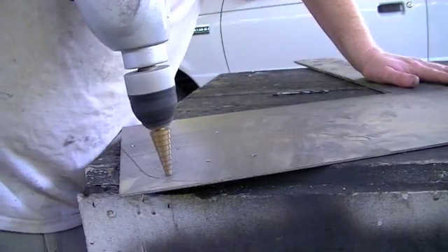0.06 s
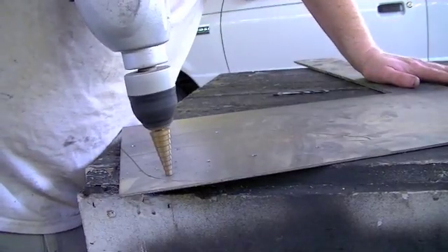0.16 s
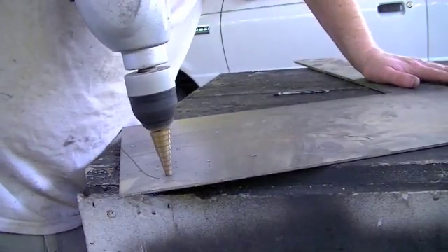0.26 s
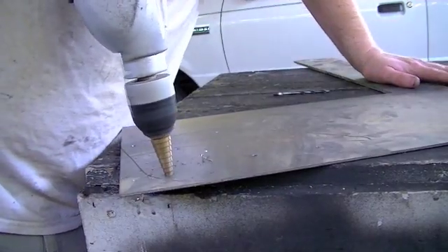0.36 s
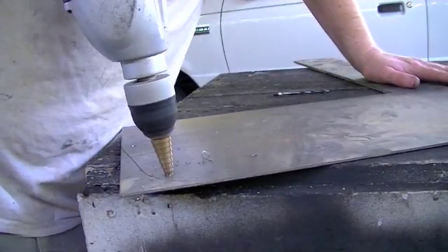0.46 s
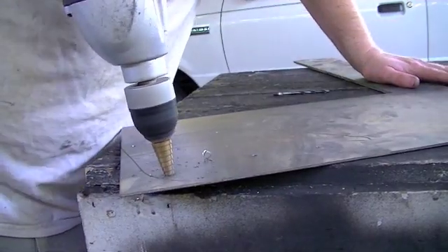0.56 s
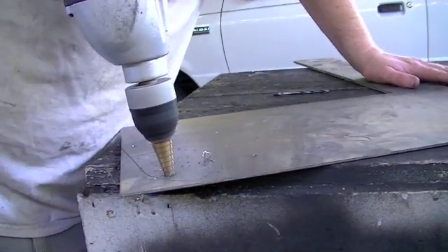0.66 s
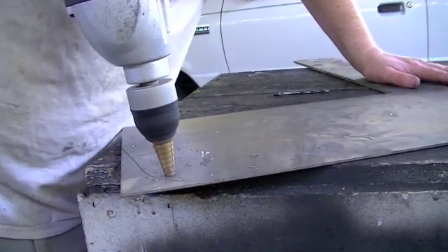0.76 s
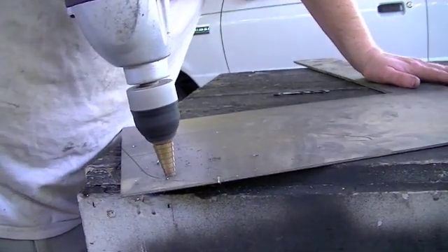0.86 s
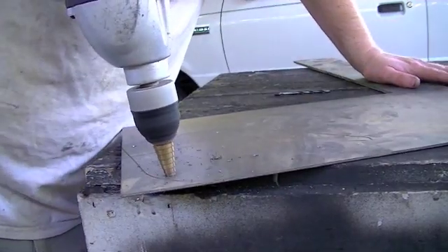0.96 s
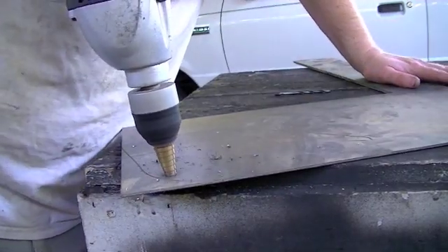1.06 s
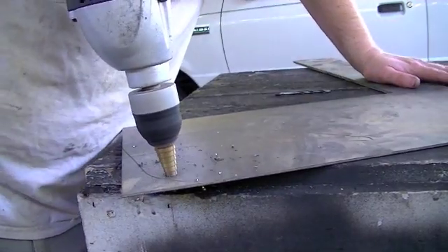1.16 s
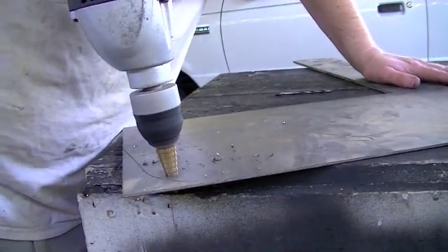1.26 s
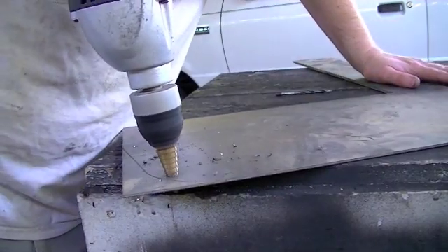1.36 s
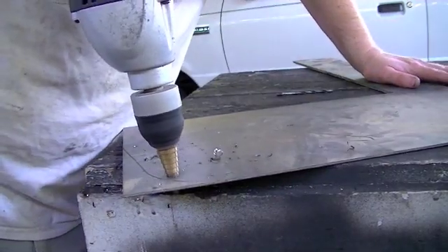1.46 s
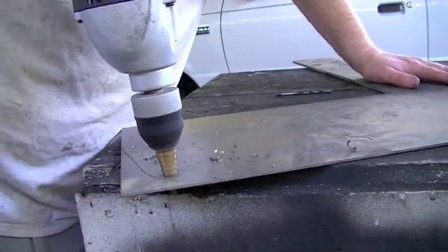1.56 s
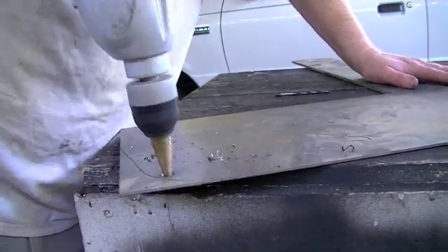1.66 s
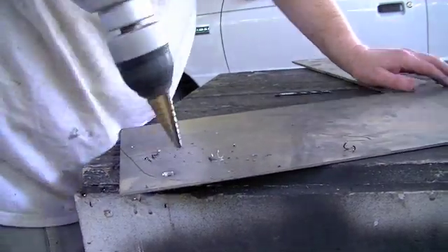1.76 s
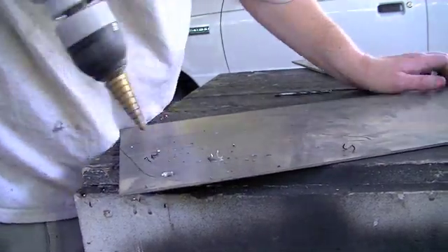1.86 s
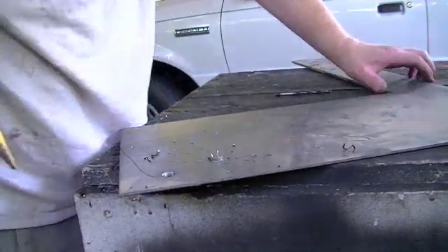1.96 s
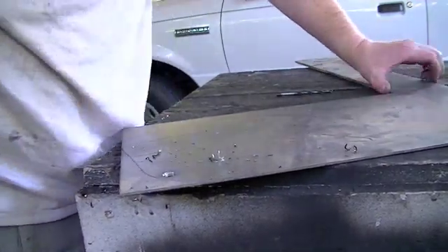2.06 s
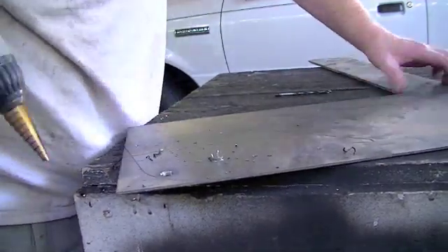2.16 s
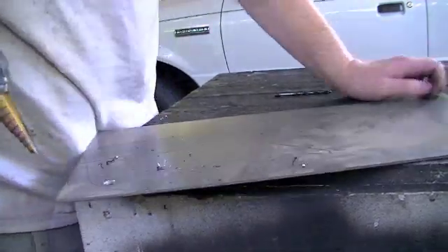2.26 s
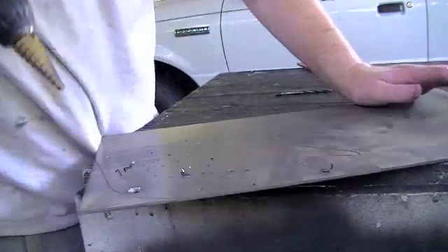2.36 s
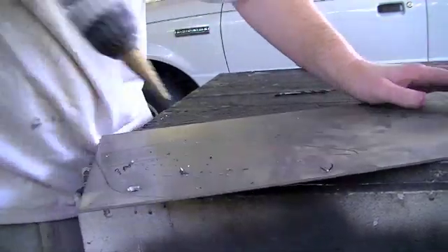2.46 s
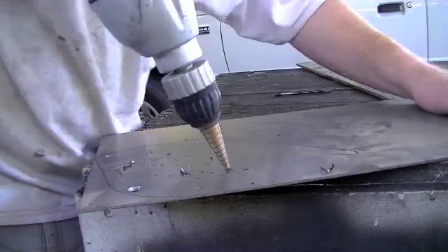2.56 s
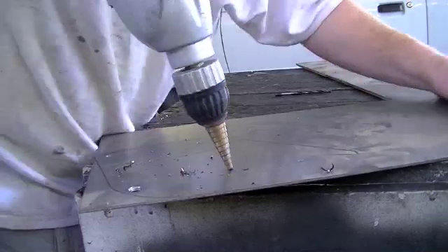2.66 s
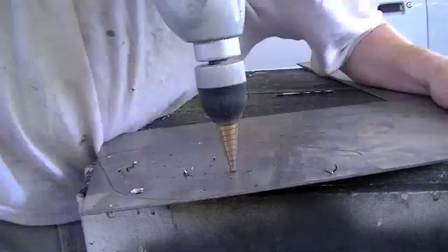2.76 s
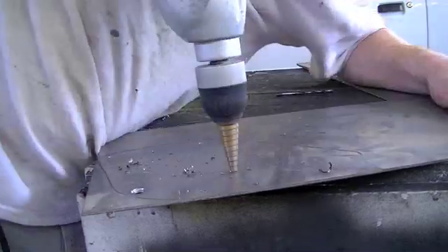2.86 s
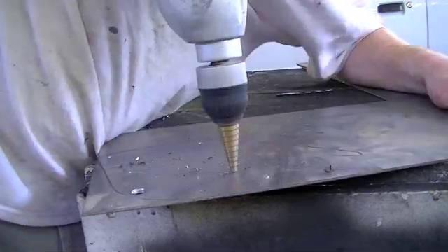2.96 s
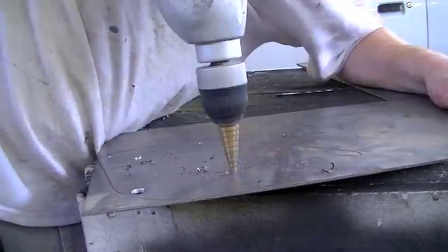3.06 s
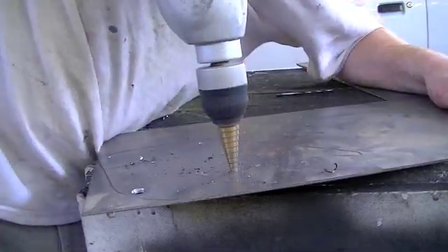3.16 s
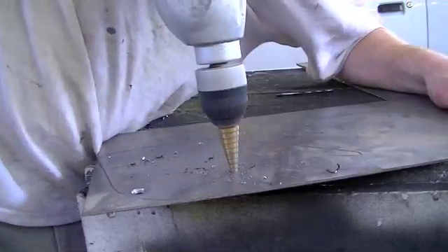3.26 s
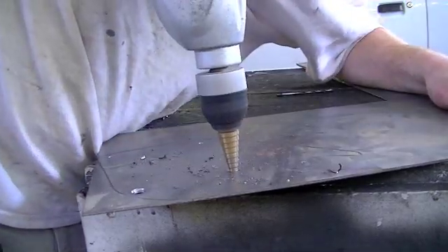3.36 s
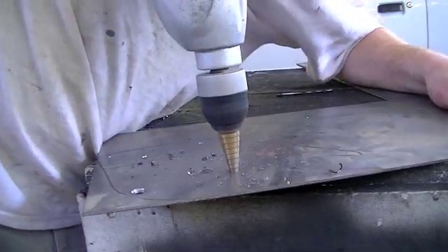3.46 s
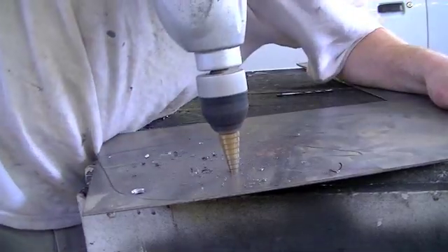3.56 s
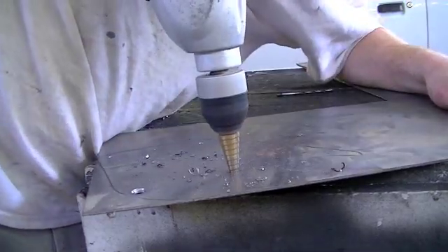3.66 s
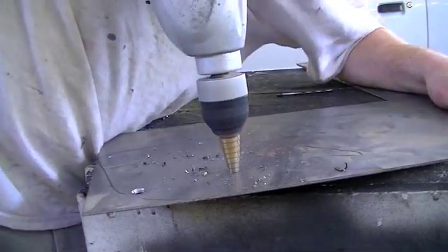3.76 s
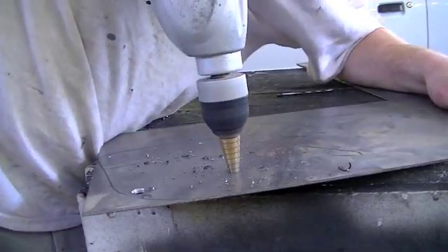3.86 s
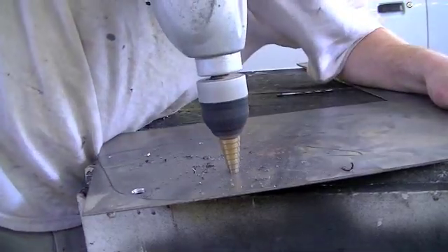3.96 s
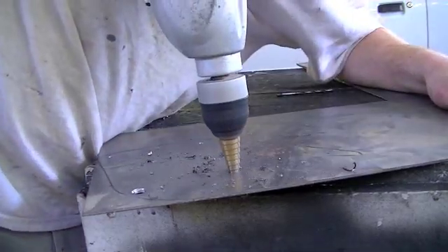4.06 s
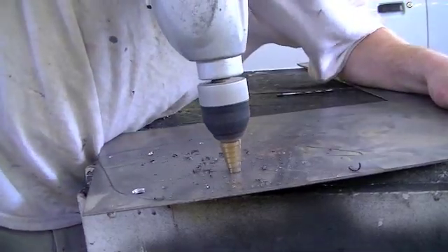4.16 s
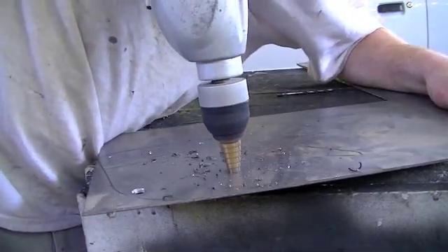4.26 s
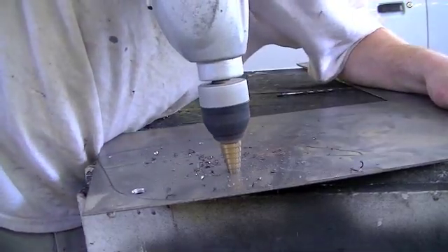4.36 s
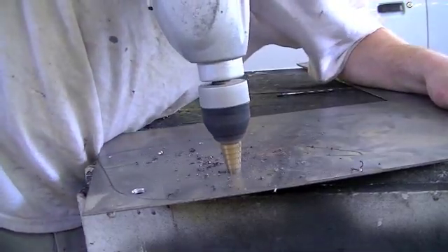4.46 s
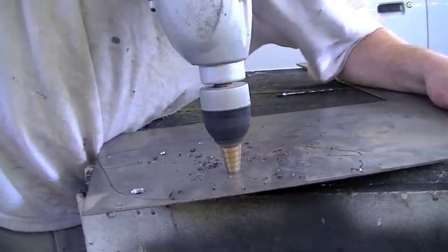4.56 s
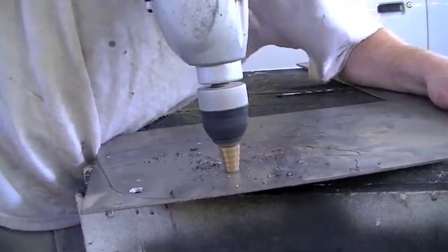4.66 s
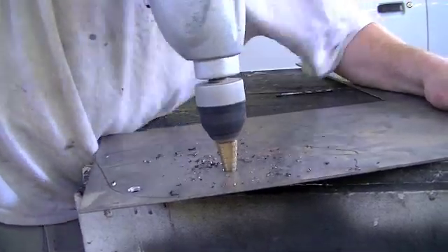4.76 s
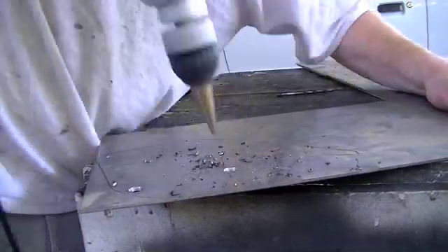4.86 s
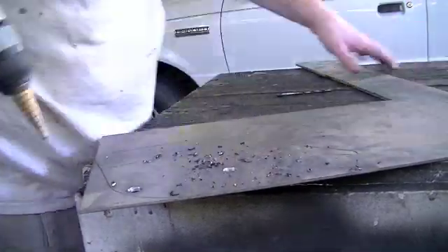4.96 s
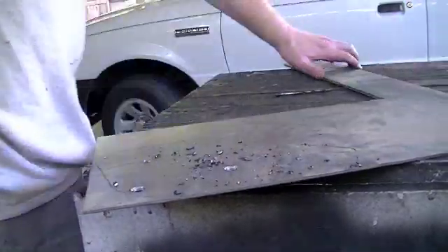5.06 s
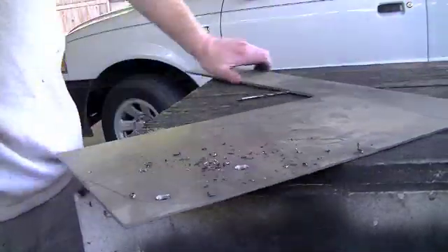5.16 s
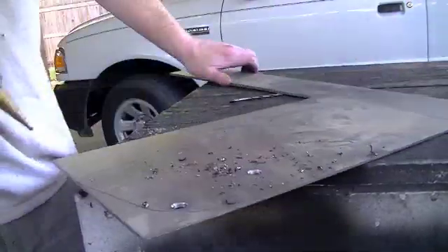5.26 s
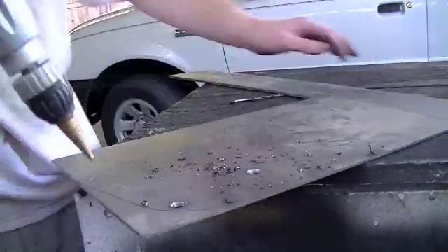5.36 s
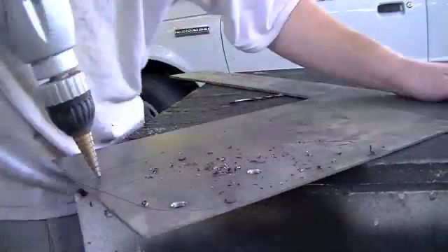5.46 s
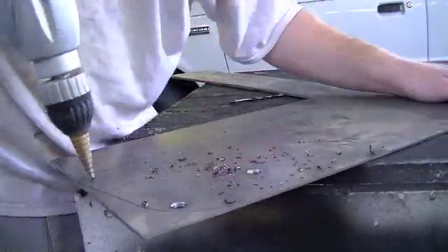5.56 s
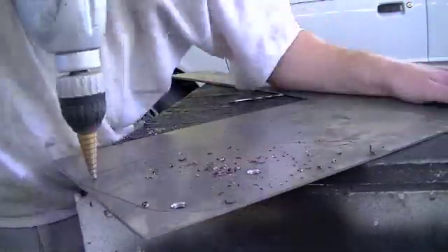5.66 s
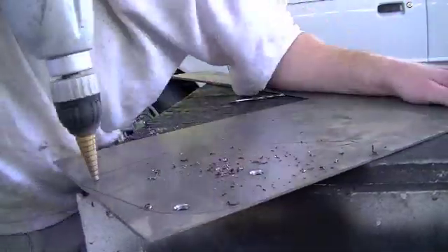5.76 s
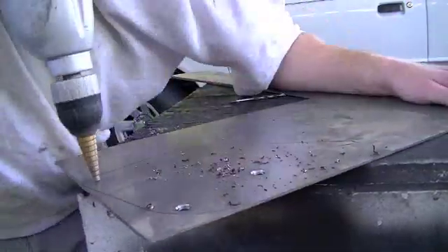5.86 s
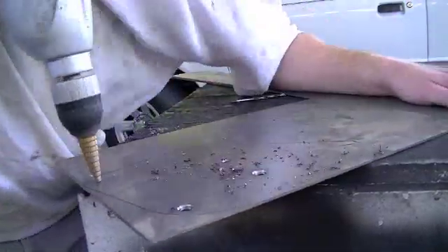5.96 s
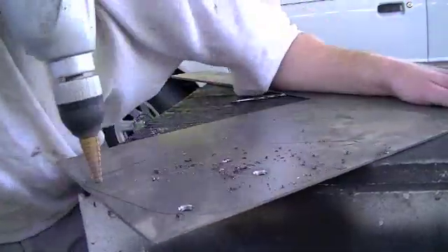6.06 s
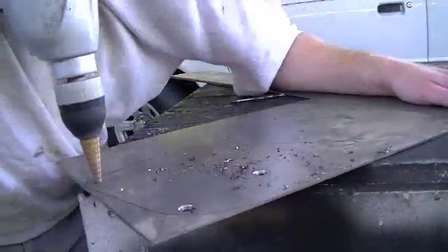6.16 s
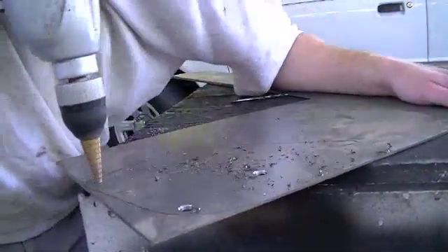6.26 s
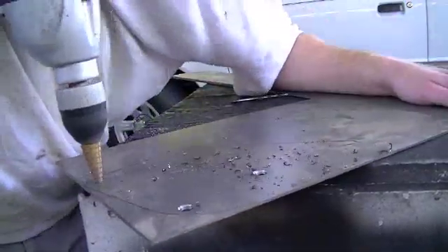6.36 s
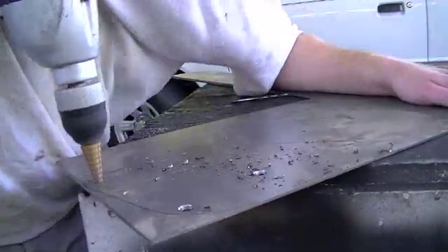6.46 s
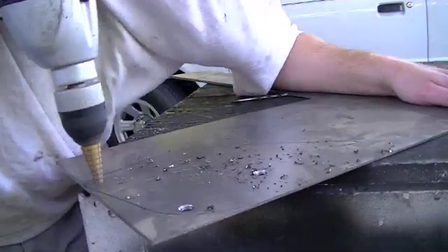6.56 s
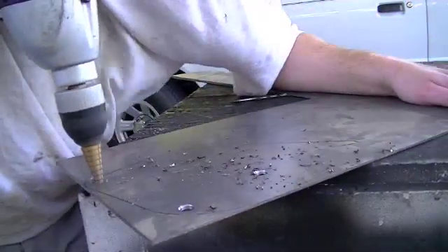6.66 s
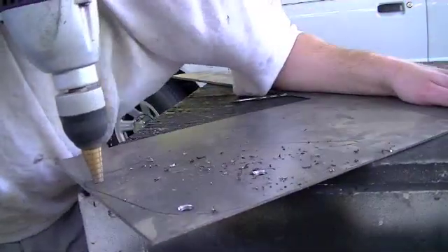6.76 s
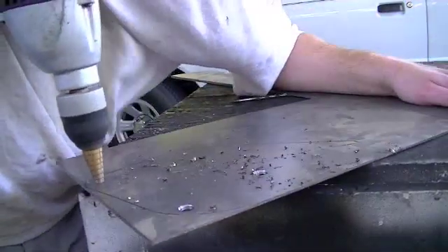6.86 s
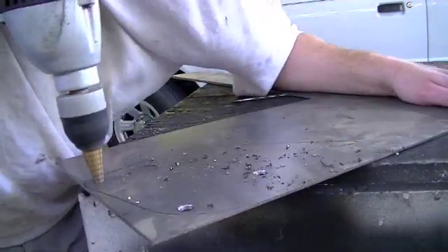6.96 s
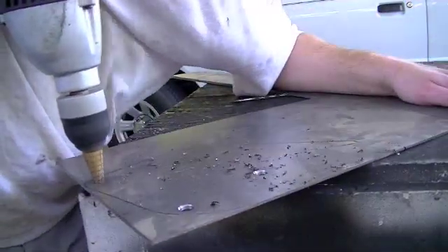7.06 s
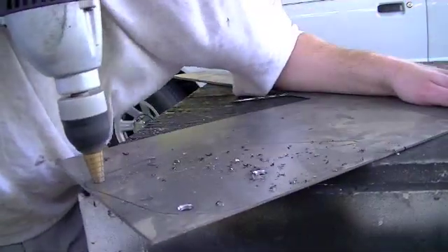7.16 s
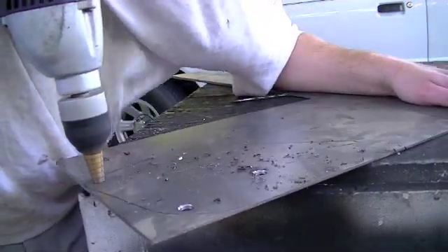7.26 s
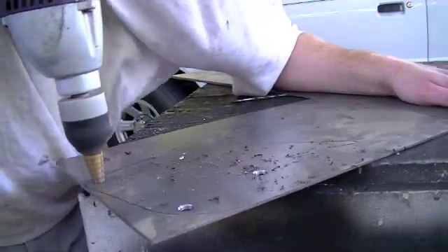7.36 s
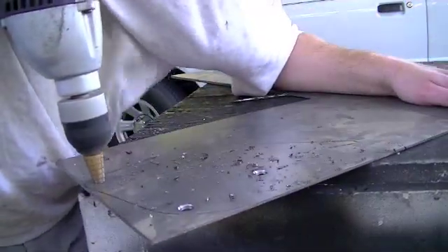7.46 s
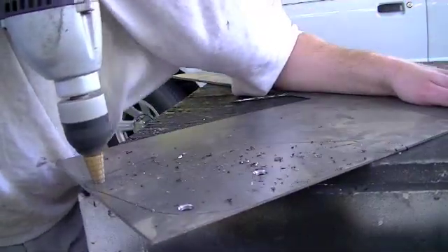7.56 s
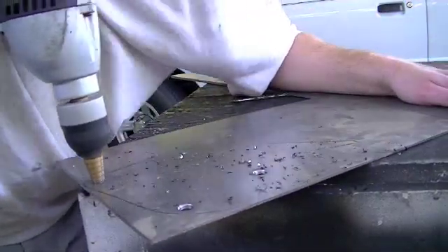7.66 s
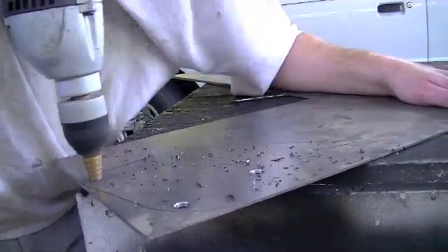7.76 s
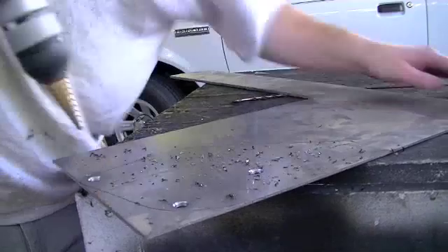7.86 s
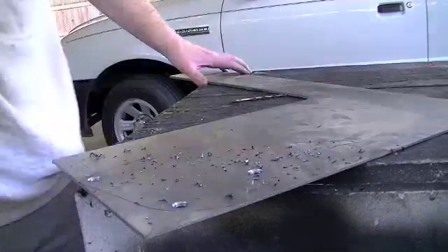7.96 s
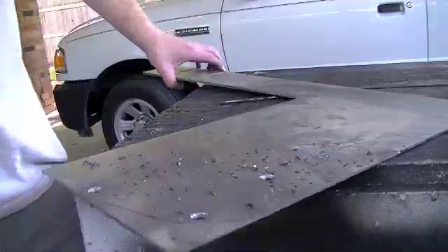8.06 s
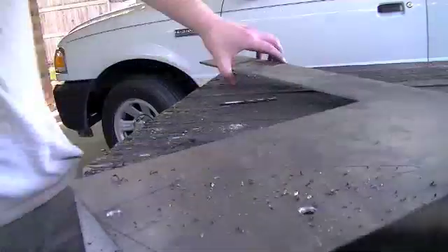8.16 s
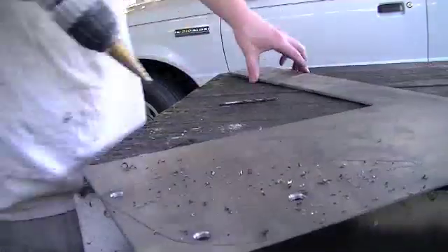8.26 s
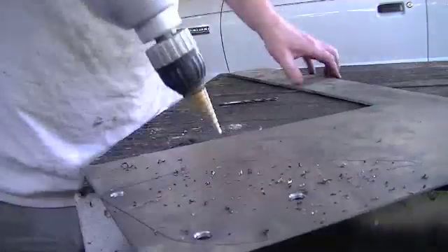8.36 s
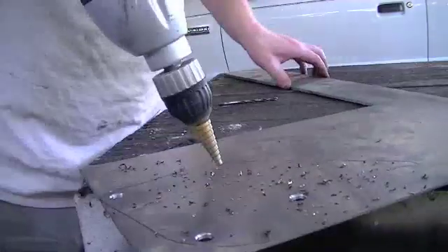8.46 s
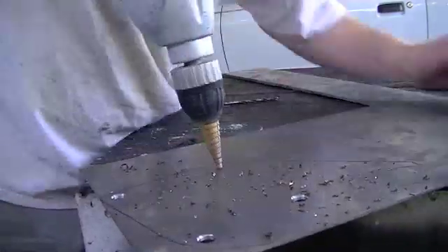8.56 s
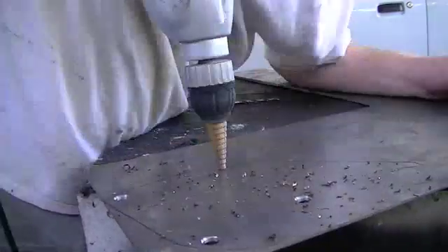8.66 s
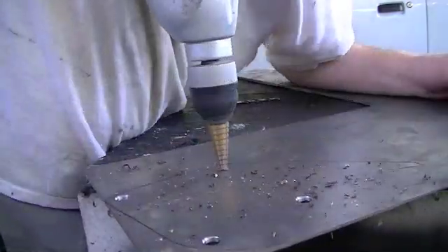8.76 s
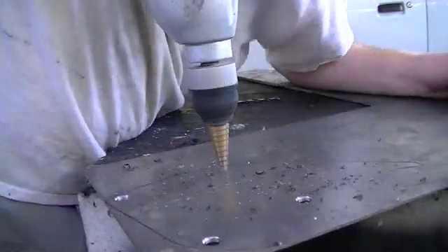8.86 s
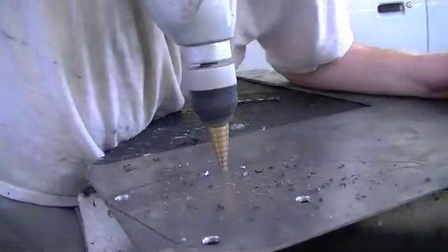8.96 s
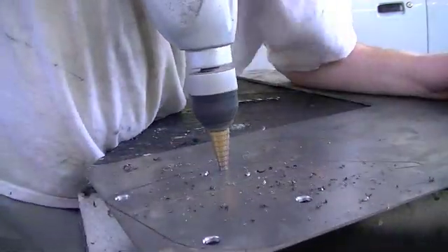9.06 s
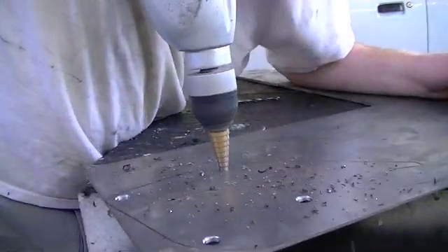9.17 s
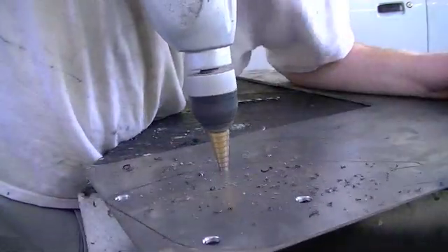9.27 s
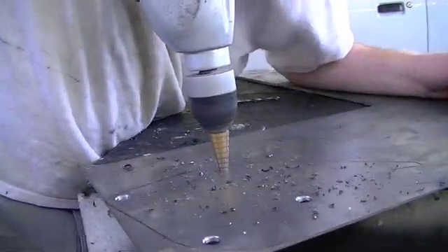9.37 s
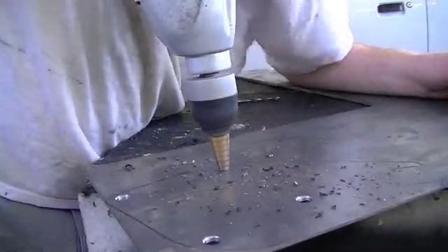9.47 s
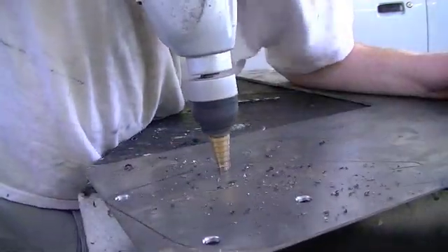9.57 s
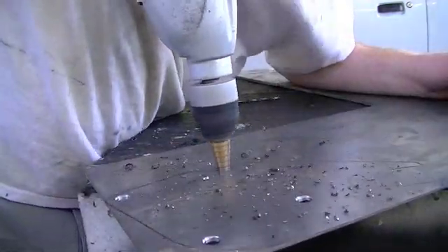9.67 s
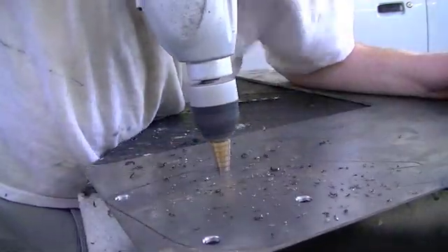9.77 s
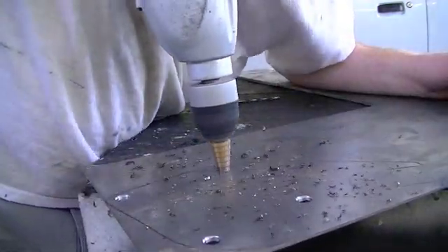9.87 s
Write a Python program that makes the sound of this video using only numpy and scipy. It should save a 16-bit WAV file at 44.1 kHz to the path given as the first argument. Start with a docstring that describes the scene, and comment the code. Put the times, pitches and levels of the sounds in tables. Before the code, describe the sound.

Close outdoor sound of an electric drill cutting a steel sheet on a bench. At 0 s it is already running, with a harsh, hard-rasping screech gliding upward and fading by 0.6 s under gusty rumble. Hissing motor whine, gear rattle and growl continue, sagging at 0.6 and 1.1 s, until release at 1.6 s and a quick falling whistle. From 2 to 2.7 s the sheet scrapes and the bit taps it. The second spell starts at 2.8 s with chattering and dull bumps, grinding on to 4.6 s. Coast-down, gritty sliding and ringing clinks fill 4.7-5.7 s. The third spell, 5.9-7.7 s, starts with a howling growl and slows repeatedly under load. Scrapes and taps return at 8.1-8.8 s. The fourth spell starts at 8.8 s, with bright sheet ringing and, from 9.5 s, a rough, swelling screech to the end. Faint open air and wavering distant hum lie behind.

```python
"""An electric drill pushes a stepped bit through a steel sheet on a bench, in four spells close to the microphone.
One tooth rate drives its whine, rattle and growl; it spins up, sags each time a step bites, and coasts down.
The cutting edge grinds in noise that rings the sheet, and twice it sticks and slips in a gliding screech.
In the pauses the sheet is slid about in grains of noise and the bit is set down on it in ringing taps.
Behind lie gusts of cooling air on the microphone, open air and the wavering hum of a distant machine."""
import sys
import numpy as np
from scipy import signal
from scipy.fft import rfft, irfft, next_fast_len
from scipy.io import wavfile
from scipy.ndimage import uniform_filter1d

SR = 44100
rng = np.random.default_rng(int(sys.argv[2]) if len(sys.argv) > 2 else 0)


def output_pcm(signal):
    """Save a mono or channel-first signal as 16-bit PCM at the path in sys.argv[1].

    Samples are clipped to [-1, 1] before scaling.
    """
    pcm = np.clip(np.atleast_2d(signal).T, -1, 1) * 32767
    wavfile.write(sys.argv[1], SR, np.round(pcm).astype(np.int16))


N = 437031

TIME = np.arange(N) / SR
PADDED = next_fast_len(N + SR // 4, real=True)
FREQ = np.maximum(np.arange(PADDED // 2 + 1) * SR / PADDED, 1)


def undb(db):
    """Decibels to gain."""
    return np.exp(np.asarray(db) * np.log(10) / 20)


def unit(x):
    """Scale to an rms of 1."""
    return x / np.sqrt(np.mean(x ** 2))


def noise():
    """White noise."""
    return rng.standard_normal(N)


def walk(rate):
    """Random drift with a spread near 1, aiming at a new value rate times a second."""
    steps = rng.standard_normal(N // 8)
    return 1.2 * np.interp(TIME * rate, np.arange(len(steps)), steps)


def grains(rate, spread_db):
    """Random tiny impacts, rate per second, a few much larger than the rest."""
    struck = rng.random(N) < rate / SR
    size_db = spread_db * np.minimum(rng.exponential(size=N), 4)
    return unit(noise() * struck * undb(size_db))


def curves(rows):
    """The columns of a timed table, gliding from row to row."""
    s, *columns = np.transpose(rows)
    return [np.interp(TIME, s, c) for c in columns]


def during(rows):
    """1 while a timed table lasts, with soft edges."""
    lasting = (TIME >= rows[0][0]) & (TIME <= rows[-1][0])
    return uniform_filter1d(1. * lasting, size=256)


def held(rows):
    """The columns of an event table, each value kept until the next event."""
    table = np.array(rows, float)
    latest = np.maximum(np.searchsorted(table[:, 0], TIME) - 1, 0)
    return table[latest].T


def eased(x):
    """Round off the jumps of a control."""
    return uniform_filter1d(x, size=2048)


def swell(s, width, power):
    """A rise and fall around a moment: pointed at power 1, round at 2."""
    out, near = np.zeros(N), np.abs(TIME - s) < 10 * width
    out[near] = np.exp(-np.abs((TIME[near] - s) / width) ** power)
    return out


def colour(points):
    """Response through (f/Hz, level/dB) points."""
    hz, db = np.transpose(points)
    return undb(np.interp(np.log(FREQ), np.log(hz), db))


def resonance(hz, width):
    """Response of one damped mode."""
    return 1 / (1 + 1j * (FREQ / hz - hz / FREQ) * hz / width)


def peak(hz, centre, width):
    """Gain of a resonance for a gliding tone."""
    return 1 / np.hypot(1, 2 * (hz - centre) / width)


def through(x, response):
    """Filter a sound."""
    return irfft(rfft(x, PADDED) * response, PADDED)[:N]


def in_band(x, lo, hi):
    """Scale a steady sound to an rms of 1 between two frequencies."""
    return x / np.std(through(x, (FREQ > lo) & (FREQ < hi)))


def turning(hz):
    """Phase of something that turns at hz."""
    return 2 * np.pi * np.cumsum(hz) / SR


def loudness(x):
    """Running mean of the absolute level, over about 0.1 s."""
    return uniform_filter1d(np.abs(x), size=4096)


# spectrum of the open air: f/Hz, relative level/dB
YARD = [(25, -36), (100, -17.5), (220, -0.5), (600, 4.5), (1100, 1), (2200, -4), (5000, -8), (11000, -12.5),
        (15800, -17)]
# hum of the distant machine: f/Hz, level/dB, both wavering
HUM = [(387, -55), (528, -49), (712, -49.5)]


def yard():
    """Open air is broad noise, drifting slowly and a little wide; a distant machine hums in unsteady tones."""
    mid, side = (unit(through(noise(), colour(YARD))) * undb(1.5 * walk(3.2)) for _ in range(2))
    side = through(side, colour([(150, -16.5), (3000, -39.5)]))
    hum = sum(undb(db + 2 * walk(2.02)) * np.sin(turning(hz + 2 * walk(9))) for hz, db in HUM)
    return undb(-40.5) * (mid + side * np.array([[1], [-1]])) + hum


# spectrum of low thumps and wind rumble: f/Hz, relative level/dB
BUFFET = [(25, -39), (60, -17), (130, -8), (260, -2), (500, 0.5), (900, -1), (1300, 1.5), (2200, -57)]
# cooling air from the drill gusts over the microphone: t/s of the peak, rise and fall/s, level/dB before flurry
GUSTS = [(.05, 0.29, -31.5), (1.635, 0.039, -34), (2.94, 0.067, -31), (3.18, 0.097, -28),
         (4.31, 0.061, -38), (4.73, 0.081, -35), (8.99, 0.052, -30.5)]
# rise and fall at which the gust's level applies in full to the deep rumble, before its trim
DEEP_GUST_S = 0.17


def buffeting():
    """Gusts rumble on the microphone, different left and right; the longer, the deeper."""
    mid, side = (unit(through(noise() + grains(rate=150, spread_db=0.5), colour(BUFFET))) for _ in range(2))
    side = through(side, colour([(120, -12.0), (300, 1.5), (1000, -6.0)]))
    gusts = sum(undb(db) * swell(s, width, power=1.16) for s, width, db in GUSTS)
    low = colour([(20, -16), (60, -8), (130, 0), (300, -7), (1000, -69)])
    deep = np.array([unit(through(noise(), low)) for _ in range(2)])
    lasting = sum(undb(db) * swell(s, width, power=1.43) * (width / DEEP_GUST_S) ** 2 for s, width, db in GUSTS)
    flurry = undb(2 * walk(90))
    return flurry * (gusts * (mid + side * np.array([[1], [-1]])) + undb(-3.5) * lasting * deep)


# modes of the sheet: f/Hz, width/Hz, relative level/dB
SHEET = [(694, 33, 2.5), (816, 28, 4.5), (1323, 41, 4), (1530, 32, 0.5), (1674, 68, -0.5), (1834, 19, 4.5),
         (2337, 55, -2.5), (2540, 23, 3.5), (2592, 170, 1), (3085, 39, 2), (3710, 240, -6), (4350, 110, -1),
         (5420, 190, -7), (7010, 170, -0.5), (8100, 1600, -14.5)]


def sheet_response():
    """The sheet answers with its damped modes, of alternating sign."""
    return sum((-1) ** k * undb(db) * resonance(hz, width) for k, (hz, width, db) in enumerate(SHEET))


# the sheet slides on the bench: t/s, length/s, level/dB at the height of the push, grit hiss over ring/dB
SLIDES = [(1.999, 0.056, -37, -10), (2.139, 0.065, -35, -8), (2.267, 0.091, -23.5, -1),
          (2.394, 0.082, -32, -5), (4.79, 0.045, -25, 3), (4.856, 0.084, -24.5, 4),
          (4.977, 0.065, -30.5, 21), (5.12, 0.18, -30, 1.5), (5.215, 0.049, -26, -3),
          (5.316, 0.048, -30, -3), (8.102, 0.086, -34, -10), (8.176, 0.1, -28, 3), (8.268, 0.1, -34.5, -1),
          (8.432, 0.065, -29.5, -20), (8.679, 0.052, -31.5, 11)]


def slides(sheet):
    """Grit catches under the sheet as it is pushed along."""
    grit = noise() + grains(rate=1100, spread_db=2.5)
    ring, hiss = unit(through(grit, sheet)), unit(through(grit, resonance(6100, 7000)))
    out = 0
    for s, length, db, hiss_db in SLIDES:
        push = np.sin(np.pi * np.sqrt(np.clip((TIME - s) / length, 0, 1)))
        out += undb(db) * push * unit(ring + undb(hiss_db) * hiss)
    return out


def blow(s, db, t60, hold=0.0032):
    """A burst of contact noise: it builds over hold seconds, then falls 60 dB in t60 seconds."""
    out, now = np.zeros(N), (TIME > s) & (TIME < s + hold + 2 * t60)
    age = TIME[now] - s
    envelope = np.minimum(age / hold, 1) * np.exp(-np.log(1000) * np.maximum(age - hold, 0) / t60)
    out[now] = undb(db) * envelope * rng.standard_normal(SR)[:len(age)]
    return out


# the bit taps the sheet: t/s, contact level/dB before filtering, ring f/Hz
TAPS = [(2.333, -20.5, 4940), (2.637, -19.5, 1340), (2.686, -22, 2286), (4.8678, -19.5, 3003),
        (5.1993, -20, 1280), (5.318, -31, 2900), (5.475, -13, 5100), (5.603, -26.5, 2300),
        (5.662, -16, 5240), (8.547, -14.5, 4250), (8.548, -18, 3160), (8.762, -17, 2960)]
TAP_WIDTH_HZ = 190


def taps(sheet):
    """The tip lands: a crack, a short ring, then the sheet buzzes against the bench."""
    out, contact = 0, 0
    for s, db, hz in TAPS:
        hit = blow(s, db, t60=0.008, hold=0.0023) + blow(s, db - 6.5, t60=0.089)
        out += undb(14) * through(hit, resonance(hz, TAP_WIDTH_HZ))
        contact += hit
    out += undb(8.0) * through(contact, sheet)
    return out + undb(-5.5) * through(contact, resonance(7400, 14000))


# the sheet bumps the bench as the bit grabs or breaks through: t/s, contact level/dB before filtering
BUMPS = [(.446, -21.5), (.617, -22.5), (1.116, -21.5), (1.557, -24), (2.911, -26), (3.103, -22),
         (3.166, -20), (3.205, -15.5), (3.243, -22), (3.382, -18.5), (4.302, -28), (4.624, -25),
         (4.695, -23), (4.716, -33), (4.797, -30), (6.433, -26), (8.966, -22), (9.125, -19.5)]


def bumps():
    """Sheet and bench knock together in dull, short bursts of low noise."""
    contact = sum(blow(s, db, t60=0.07) for s, db in BUMPS)
    return undb(6.5) * through(contact, colour(BUFFET))


# the sheet judders under the bit or on the bench: t/s of the peak, rise and fall/s, level/dB before trims, howl f/Hz
CHATTER = [(2.5, 0.13, -38.5, 1730), (2.92, 0.064, -26.5, 1382), (3.069, 0.066, -27, 1403),
           (4.74, 0.027, -30, 800), (6.096, 0.037, -26, 689), (6.9, 0.045, -29, 1708),
           (7.832, 0.042, -32, 843), (9.832, .12, -25.5, 785)]
# rate at which the howl flutters, and trims of the sheet's rattle and of the howl
CHATTER_WIDTH_HZ, CHATTER_SHEET_DB, HOWL_DB = 120, -3.5, -1.5


def chatter(sheet):
    """The bit rattles against the rim of the hole and sets one mode of the sheet howling."""
    knocks = noise() + grains(rate=670, spread_db=7.0)
    body = undb(CHATTER_SHEET_DB) * unit(through(knocks, sheet * colour([(1500, -3), (4000, -15)])))
    strength = undb(HOWL_DB + 2.0 * walk(CHATTER_WIDTH_HZ))
    wander = 1.2 * walk(CHATTER_WIDTH_HZ) + 1.7 * walk(15)
    out = 0
    for s, width, db, hz in CHATTER:
        howl = strength * np.sin(2 * np.pi * hz * TIME + wander)
        out += undb(db) * swell(s, width, power=1.24) * (howl + body)
    return out


# the edge sticks and slips, one list a screech: t/s, slip rate f/Hz, level/dB before trims
SCREECH = [
    [(0, 1836, -11.5), (.09, 1940, -13), (.2, 2015, -13.5), (.3, 2055, -17), (.42, 2086, -21),
     (.6, 2110, -35)],
    [(9.5, 1743, -35), (9.62, 1727, -22), (9.72, 1738, -17.5), (9.8, 1725, -17.5), (9.84, 1718, -15),
     (9.91, 1703, -13.5)],
]
# spectrum of the scraping: f/Hz, relative level/dB
RASP = [(40, -45), (100, -47), (150, -4), (350, -3), (620, -2), (900, -2.5), (1900, 0), (3000, 1.5),
        (4100, 3.5), (5400, 4), (6400, -5), (8000, -6.5), (11000, -8.5), (15000, -36)]
# resonance of the bit, which lifts the octave of the screech into pulsing bursts
BIT_HZ, BIT_WIDTH_HZ, BIT_DB = 4080, 540, 11


def screech(rows, mesh, sheet):
    """Stick-slip makes a rough squeal over a hard rasp; every second tooth jolts the bit into ringing."""
    hz, db = curves(rows)
    slip = turning(hz * (1 + 0.0055 * walk(250)))
    jolt = np.cos(mesh / 2 + 0.4 * walk(40))
    partials = [(1, 2.0), (2, -4.5), (3, 0.0), (4, -2.0)]  # multiple, level/dB
    squeal = sum(undb(d + 2.6 * walk(50)) * np.sin(k * slip) for k, d in partials)
    # an undertone below the slip rate
    squeal += undb(-5.0 + 5.4 * walk(30)) * np.sin(.319 * slip + 0.3 * walk(60))
    lift = undb(BIT_DB) * peak(2 * hz, BIT_HZ, BIT_WIDTH_HZ) ** 2
    bursts = lift * (1 + jolt) / 2 * np.sin(2 * slip + walk(110))
    scraping = noise() + 0.42 * grains(rate=1100, spread_db=3.0)
    scraping *= undb(1.3 * walk(110)) * (1 + 0.12 * jolt)
    rasp = unit(through(scraping, colour(RASP))) + undb(-18) * unit(through(noise(), sheet))
    tone = squeal * (1 + 0.15 * jolt) + 1.05 * bursts
    return during(rows) * undb(db) * (undb(-13.0) * tone + undb(-1.5) * rasp)


# spells of drilling, one hole each: trigger pulled t/s, trigger released t/s, then levels/dB before trims and
# drive: rush of air, gear rattle against the air, ring of the gear case, run-down whistle, high ring of the sheet
SPELLS = [(-.5, 1.618, -23, 1, -33.5, -28, -31), (2.818, 4.58, -22, -5, -28.5, -26, -44),
          (5.935, 7.725, -22, 1.5, -26.5, -29.5, -41), (8.757, 10.08, -21.5, -4.5, -24.5, -41, -26)]
# the tip or the next step of the bit meets the metal, or the load eases: t/s, sag f/Hz, cutting speed f/Hz,
# extra speed while the cut is shallow f/Hz, grinding level/dB before its trim
STEPS = [(-.02, 4, 149.5, -2, -36), (.23, 0, 174.3, 0, -38), (.489, 0, 182, 0, -49),
         (0.619, 30.5, 167, 6, -52), (1.099, 23.5, 156.9, 8, -40), (1.585, 40, 157, 3, -29.5),
         (2.82, 0, 173, 0, -28), (2.96, 84, 181.4, .5, -30), (3.372, 8, 171.2, 2.5, -38),
         (3.781, 5, 164.1, 1.5, -33), (4.205, 27, 154.6, .5, -31.5), (4.633, 36.5, 150.5, 0, -15),
         (5.936, 0, 169.3, .5, -32), (6.1, 74, 173.6, 1, -30), (6.413, 15, 163.1, 12.5, -43),
         (6.786, 25, 155.4, 10.5, -45), (7.165, 36, 165, -4, -29.5), (7.53, 6, 155.6, .5, -38),
         (7.72, 37.5, 152, 0, -23), (8.757, 0, 172.5, 0, -26.5), (9.117, 12, 166, 2, -35),
         (9.521, 13, 156.3, 0, -30)]
# speeds are gear teeth per second; time constants of spin-up, the fall into a snag, recovery and the shallow cut
SPIN_UP_S, SNAG_S, RECOVER_S, SHALLOW_S = .024, .016, .045, .2
# released, it coasts down against air drag and brush friction
COAST_FROM_HZ, COAST_S, FRICTION_HZ = 155, .26, 15


def motor_speed():
    """Tooth rate and share of drive: it spins up, snags on each step, shifts while the cut is shallow, coasts."""
    pulled, released = held(SPELLS)[:2]
    start, _, cutting_speed, extra = held(STEPS)[:4]
    shallow = np.exp(-((TIME - start) / SHALLOW_S) ** 4)
    cruise = eased(cutting_speed + extra * shallow)
    snags = sum(sag * np.exp(-np.maximum((s - TIME) / SNAG_S, (TIME - s) / RECOVER_S)) for s, sag, *_ in STEPS)
    driven = (cruise - snags) * (1 - np.exp(-(TIME - pulled) / SPIN_UP_S))
    slowing = (COAST_FROM_HZ + FRICTION_HZ) * np.exp((released - TIME) / COAST_S) - FRICTION_HZ
    coasting = np.maximum(slowing, 0)
    drive = np.exp(-np.maximum(TIME - released, 0) / 0.097) * np.minimum((TIME - pulled) / 0.0013, 1)
    return np.minimum(driven, coasting), drive


def cutting(drive, sheet):
    """Chips tear off the edge in quick uneven spurts and ring the sheet."""
    tearing = (noise() + 1.4 * grains(rate=650, spread_db=1.5)) * undb(2 * walk(70))
    ring = through(tearing, sheet * colour([(600, -7.5), (1400, 5.5), (3000, -2.5), (9000, 11)]))
    grind = drive * undb(eased(held(STEPS)[-1]))
    return undb(-7) * grind * in_band(ring, 1150, 2000)


# high modes of the sheet: f/Hz, width/Hz
HIGH_SHEET_MODES = [(4450, 280), (5270, 300), (7010, 310), (8700, 1100)]


def high_sheet_ring(drive):
    """Chips snap off the edge and ring the sheet's high modes."""
    ring_db = held(SPELLS)[6]
    snaps = grains(rate=900, spread_db=2) * undb(2 * walk(40))
    modes = sum(resonance(hz, width) ** 2 for hz, width in HIGH_SHEET_MODES)
    return drive * undb(ring_db) * unit(through(snaps, modes))


# the seated bit growls: from t/s, to t/s, low sheet mode f/Hz, its level/dB, high mode f/Hz, its level/dB,
# half harmonics relative level/dB
GROWLS = [(-.1, .54, 660, -40, 1530, -44, -12), (.66, 1.08, 912, -32.5, 1710, -34.5, -25),
          (1.16, 1.56, 975, -30, 1630, -41, -27), (3.02, 3.36, 789.6, -31.5, 1430, -40, -6),
          (3.77, 4.61, 853, -44.5, 1291, -39, -28), (5.99, 6.08, 810, -23, 1398, -28, -8),
          (6.16, 6.41, 796.6, -29, 1520, -32, -7), (6.44, 6.76, 832, -35.5, 1453, -41, -19),
          (6.83, 7.14, 844, -31, 1672, -41, -33), (7.23, 7.71, 869, -35.5, 1395, -44, -21),
          (8.8, 8.91, 728, -28, 1310, -24, -9), (9.14, 9.51, 806, -39, 1342, -37, -28)]
# the sheet lifts the gear harmonics near its modes, and one steady mode where it lies on the bench
GROWL_WIDTH_HZ, BENCH_HZ, BENCH_WIDTH_HZ, BENCH_DB = 156, 655, 68, -43.5
TEETH_PER_TURN, THROB = 14, .25


def growl(mesh, speed):
    """Gear teeth shake the seated bit on the sheet, throbbing once a turn; a hopping bit adds half harmonics."""
    seated = eased(1. * (TIME < held(GROWLS)[1]))
    low_hz, low_db, high_hz, high_db, hop_db = map(eased, held(GROWLS)[2:])
    modes = [(low_hz, GROWL_WIDTH_HZ, undb(low_db)),
             (high_hz, GROWL_WIDTH_HZ, undb(high_db)),
             (BENCH_HZ, BENCH_WIDTH_HZ, undb(BENCH_DB))]
    out, wobble = 0, walk(60)
    for k in np.arange(4, 12, .5):
        gain = sum(size * peak(k * speed, hz, width) ** 2 for hz, width, size in modes)
        flutter = undb(2 * walk(12) + (hop_db if k % 1 else 0))
        out += gain * flutter * np.sin(k * (mesh + .05 * wobble))
    return out * seated * (1 + THROB * np.cos(mesh / TEETH_PER_TURN))


# the narrow metallic ring of the case builds up from each pull of the trigger, as the bit sinks in
CASE_HZ, CASE_WIDTH_HZ, CASE_BUILD_S = 2576, 72, 0.39


def case_ring(mesh, speed, drive):
    """The teeth ring the main mode of the gear case: the nearest harmonics stand out of a narrow sizzle."""
    pulled, ring_db = held(SPELLS)[[0, 4]]
    teeth = sum(peak(k * speed, CASE_HZ, CASE_WIDTH_HZ) ** 2 * np.sin(k * mesh + .7 * walk(70))
                for k in range(14, 21))
    sizzle = unit(through(noise(), resonance(CASE_HZ, CASE_WIDTH_HZ) ** 2))
    build = 1 - np.exp(-((TIME - pulled) / CASE_BUILD_S) ** 2)
    return drive * build * undb(ring_db + 1.0 * walk(12)) * (undb(-3.5) * teeth + undb(-5.0) * sizzle)


# spectrum of air and rattle: f/Hz, relative level/dB
RUSH = [(300, -58), (700, -11), (1300, -8), (2050, -3), (2500, 2), (3100, 3), (4100, -4.5), (5500, 0),
        (8500, 0), (10000, 1.5), (12500, 3), (15800, 0)]
# modes of the gear case: f/Hz, width/Hz, relative level/dB
CASE = [(2537, 140, 0.5), (3120, 250, -4.5), (3634, 120, -1)]
# the hiss starts a little louder at each pull of the trigger and settles
SURGE_DB, SURGE_S = 1.5, 0.15
# tooth rate around which the rush fades out
CRAWL_HZ = 36.8


def motor_rush(mesh, speed, drive):
    """Cooling air and sparking brushes hiss; the gear train rattles in the housing, repeating every second tooth."""
    pulled, _, rush_db, rattle_db = held(SPELLS)[:4]
    hiss = noise() + 0.65 * grains(rate=2500, spread_db=-2.0)
    hiss = unit(hiss) * (1 + 0.11 * np.cos(mesh)) * undb(1.1 * walk(45))
    cycle = rng.standard_normal(512)
    place = mesh / (4 * np.pi) * len(cycle)
    rattle = np.interp(place, np.arange(len(cycle)), cycle, period=len(cycle))
    case = undb(-5.5) * resonance(2900, 2000) + sum(undb(db) * resonance(hz, width) for hz, width, db in CASE)
    rattle = through(rattle * undb(2 * walk(25)), case)
    surge = undb(SURGE_DB * np.exp((pulled - TIME) / SURGE_S))
    air = through(hiss, 1 - 0.22 * resonance(1960, 1450)) * surge
    rush = in_band(through(air + undb(rattle_db) * drive * rattle, colour(RUSH)), 9800, 15500)
    # coasting leaves mostly the thin hiss of the brushes
    brushes = through(rush, colour([(2500, -9.5), (5000, -5.0), (7000, -1.5)]))
    moving = speed ** 3 / (speed ** 3 + CRAWL_HZ ** 3)
    return undb(rush_db) * (drive * rush + (1 - drive) * brushes) * moving


# cycles of the fan and commutator tones per gear tooth
FAN_ORDER, COMMUTATOR_ORDER = 16.72, 52
# the commutator whine away from any resonance, before its flutter
WHINE_DB = -33.5
# resonances of the housing, which the fan and commutator tones glide through: f/Hz, width/Hz, level/dB
HOUSING = [(2581.4, 58, -21.5), (2945, 170, -24), (8020, 159.5, -30), (9070, 270, -28.5), (9310, 220, -24)]
# whistles of the coasting armature: multiple of the tooth rate, resonance f/Hz, width/Hz, relative level/dB
ARMATURE = [(COMMUTATOR_ORDER / 2, 2670, 2040, 0), (COMMUTATOR_ORDER, 3200, 870, 1)]


def housing(hz):
    """Gain of the housing for a gliding tone: the powers of its resonances add."""
    return np.sqrt(2 * sum((undb(db) * peak(hz, centre, width)) ** 2 for centre, width, db in HOUSING))


def motor_tones(mesh, speed, drive):
    """Fan and commutator sing, locked to one shaft; the armature whistles as it coasts through resonances."""
    fan = drive * housing(FAN_ORDER * speed)
    whine = drive * np.hypot(housing(COMMUTATOR_ORDER * speed), undb(WHINE_DB))
    # gear play shakes the fan tone once a tooth
    shake = undb(2 * walk(30) - 6) * (1 + .5 * np.cos(mesh))
    out = fan * shake * np.sin(FAN_ORDER * mesh + .25 * walk(90))
    # the brushes bounce, so the thin whine is rough and comes and goes
    bounce = undb(2 * walk(150) + 1.5 * walk(20) + .5)
    out += whine * bounce * np.sin(COMMUTATOR_ORDER * mesh + .6 * walk(350))
    whistle_db = held(SPELLS)[5]
    for order, hz, width, db in ARMATURE:
        sings = (1 - drive ** 4) * peak(round(order) * speed, hz, width) ** 4
        out += undb(whistle_db + db) * sings * np.sin(round(order) * (mesh + .037 * walk(200)))
    return out


# mean level of the screech at which the gain control turns the drill down by 3 dB
DUCK_DB = -26.5


def scene():
    """Drill, sheet and bench in front of the microphone, with gain control among them."""
    speed, drive = motor_speed()
    mesh = turning(speed * (1 + 0.001517 * walk(35)))  # phase of the gear teeth
    sheet = sheet_response()
    squeal = sum(screech(rows, mesh, sheet) for rows in SCREECH)
    drill = motor_tones(mesh, speed, drive) + motor_rush(mesh, speed, drive) + case_ring(mesh, speed, drive)
    drill += cutting(drive, sheet) + growl(mesh, speed) + high_sheet_ring(drive)
    # the gain control turns the drill down under the screech, and the surroundings under any loud near sound
    ducked_drill = drill / np.hypot(1, loudness(squeal) / undb(DUCK_DB))
    near = ducked_drill + squeal + chatter(sheet) + slides(sheet) + taps(sheet) + bumps()
    ducked_yard = yard() / (1 + (loudness(near) / 0.063) ** 2)
    return near + buffeting() + ducked_yard


TOP_HZ = 15950


def record(dry):
    """The microphone rounds the highest peaks and cuts the top."""
    rounded = np.tanh(.6 * dry) / .6
    return signal.sosfilt(signal.ellip(12, .1, 80, TOP_HZ, fs=SR, output="sos"), rounded)


dry = scene()
out = record(dry)
output_pcm(out)
```